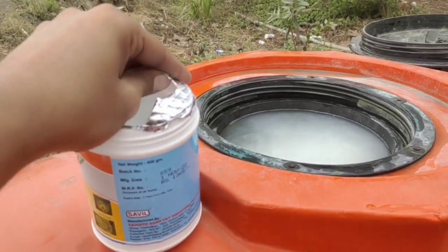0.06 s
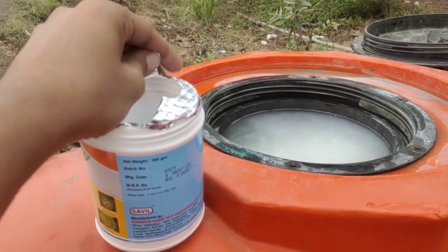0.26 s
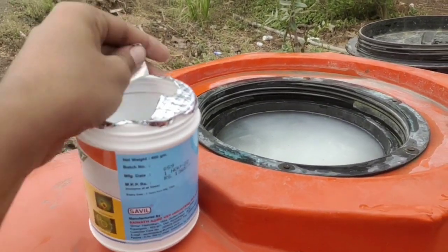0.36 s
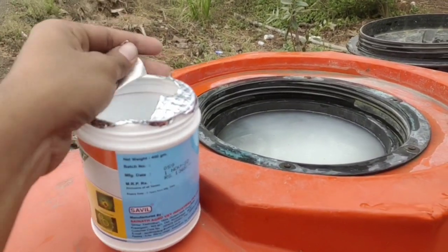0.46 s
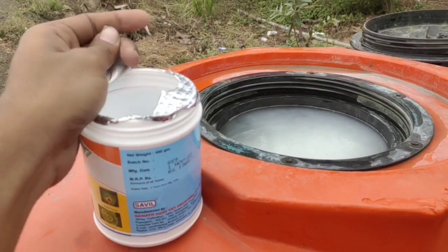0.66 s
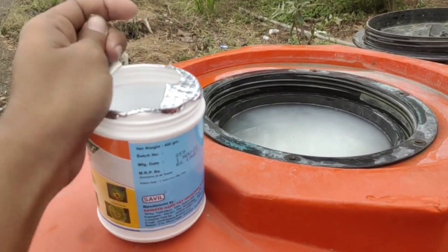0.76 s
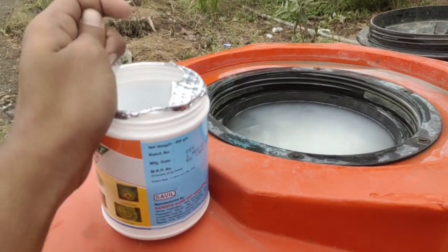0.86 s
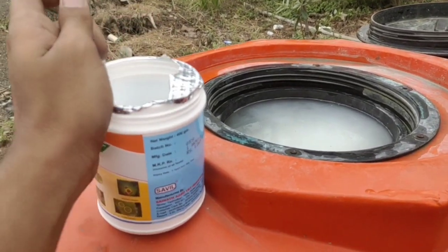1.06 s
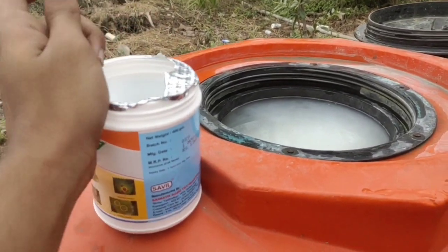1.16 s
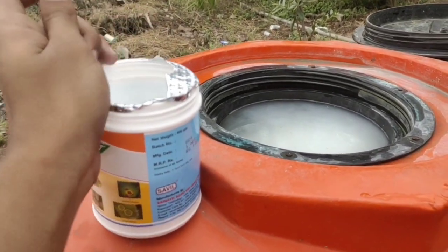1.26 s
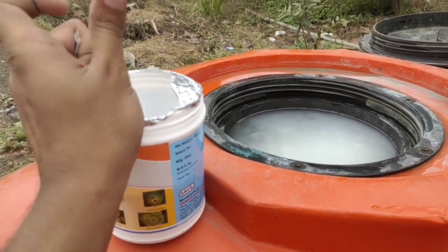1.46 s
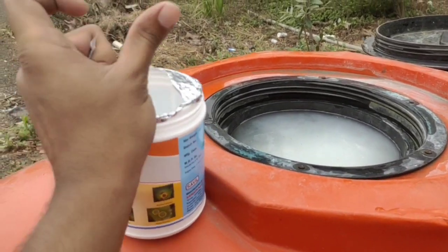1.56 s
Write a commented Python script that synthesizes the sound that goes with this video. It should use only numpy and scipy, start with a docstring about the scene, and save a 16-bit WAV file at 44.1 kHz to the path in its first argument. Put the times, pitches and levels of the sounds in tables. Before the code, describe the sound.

Crinkly foil lid creaks and pops free from a plastic jar while a bird chirps repeatedly

```python
"""First come a faint snap of foil and a bird's two-note call, which goes on repeating.
Outdoors, fingers peel a foil seal off a plastic jar: it creaks, lets go with a pop and is crumpled with small snaps.
Foil and jar are ringing modes with short hisses, over a rustle made of tiny random crackles.
The bird is gliding whistles with a diffuse trail, and an insect is a rising tone roughened by noise.
Far chatter, a low rumble (wind, and the pop's deep thump) and the outdoor hiss are shaped noise bands."""
import sys
import numpy as np
from scipy import signal
from scipy.fft import rfft, irfft
from scipy.io import wavfile

SR = 44100
rng = np.random.default_rng(int(sys.argv[2]) if len(sys.argv) > 2 else 0)


def dump(signal):
    """Clip the signal to [-1, 1] and save it as 16-bit WAV at the path in sys.argv[1]."""
    limited = np.clip(np.atleast_2d(signal).T, -1, 1)
    pcm = np.round(limited * 32767).astype(np.int16)
    wavfile.write(sys.argv[1], SR, pcm)


N = 72765  # length of the scene in samples


def amp(db):
    """Turn dB into a gain."""
    return 10 ** (np.asarray(db) / 20)


def rms_one(x):
    """Scale a sound to an rms of 1."""
    return x / np.sqrt(np.mean(x ** 2) + 1e-20)


def in_time(rows):
    """Draw straight lines through the rows of a table: one curve per column, one value per sample."""
    seconds, *columns = np.transpose(rows)
    return [np.interp(np.arange(N) / SR, seconds, column) for column in columns]


def at_hz(points, hz):
    """Read a spectrum table at any frequency, along a logarithmic pitch scale."""
    table_hz, values = np.transpose(points)
    return np.interp(np.log(hz), np.log(table_hz), values)


def drift(rate_hz):
    """Slow random wandering with a spread of 1: smoothed noise, made at every 40th sample."""
    r = np.exp(-2 * np.pi * rate_hz * 40 / SR)
    noise = rng.standard_normal(N // 40 + 2002)
    slow = signal.lfilter([1], [1, -2 * r, r * r], noise)[2000:]  # skip the filter's start
    return np.interp(np.arange(N) / 40, np.arange(len(slow)), rms_one(slow))


def band(x, low_hz, high_hz):
    """Keep only the sound between two frequencies."""
    sos = signal.butter(2, [low_hz, min(high_hz, .45 * SR)], "band", fs=SR, output="sos")
    return signal.sosfilt(sos, x)


def coloured(x, spectrum):
    """Shape a sound by a spectrum table, then scale to an rms of 1."""
    hz = np.arange(N // 2 + 1) * SR / N + 1  # 1 Hz up, to avoid the log of zero
    return rms_one(irfft(rfft(x) * amp(at_hz(spectrum, hz)), N))


def ports(x, left_db, lag_ms):
    """Two microphones: the left one is left_db stronger and hears lag_ms later."""
    n = np.arange(len(x))
    left = np.interp(n - lag_ms * SR / 1000, n, x)
    return np.array([amp(left_db / 2) * left, amp(-left_db / 2) * x])


def glide(from_hz, to_hz, path):
    """A sine tone whose pitch moves from one frequency to another as path goes from 0 to 1."""
    return np.sin(2 * np.pi * np.cumsum(from_hz + (to_hz - from_hz) * path) / SR)


# The snaps of the foil. Each row: start in seconds, relative level in dB, eleven tone colour values in dB
# (one for each frequency in COLOUR_HZ), left over right in dB, lag of the left ear in ms,
# rise time in ms, stretch of the ringing (a factor), level of the after-hiss in dB against the ring.
FOIL_SNAPS = [(0.014, -45.5, -57, -29, 2.5, -19.5, -58.5, -44, -48, -31, -36, -43, -43, -4, 0.6, 0.26, 1.7, -41),
              (0.096, -58.5, -42, -2, 2, -16, -6, -5, -2, -13, -22, -31, -35, 3.5, 0.57, 0.3, 1.5, -10),
              (0.132, -34.5, -32.5, 11.5, -17, -29, 5, -16.5, -23, -19.5, -32, -36, -50, 3.5, 0.5, 0.21, 1.17, -22),
              (0.142, -42.5, -20.5, 17, -18, -13, -5, -34, -31, -24, -24, -41, -43, 3, 0.57, 0.19, 1.8, -30),
              (0.153, -47, -38, 19, -3, -10, -20, -33, -45, -29, -31, -28, -41, -2, 0.85, 0.3, 1.7, -9),
              (0.222, -9, -9, -24.5, -50, -10, -11, -28, -58, -21, -7, -38, -13, 1.5, 0.5508, 0.26, 1.139, -22.5),
              (0.242, -26, -10, -23, -33, -24, 1.5, -23.5, -29, -14, -40, -11, -18.5, -2, 0.5, 0.3, 1.05, -8.5),
              (0.254, -42.5, 0, -27.5, -21.5, -22.5, -1, -23.5, -22.5, -10.5, -43, -20.5, -11, 5.5, 0.66, 0.39, 1.4, -23.5),
              (0.427, -48.5, -5, -31, -18, -34, -20, -24.5, -17, -21, -14, -44, -12, 5, 0.44, 0.54, 0.69, -5.5),
              (0.598, -67.5, 13, -31, -29, -37, -23, -31, -21, -10, -10, -25, 3, -4, 0.55, 0.5, 1.05, -13),
              (0.663, -37, -12.5, -26, -17, -44.5, -16, -15.5, -22, -13.5, -27.5, -27, -22, 1, 0.48, 0.29, 0.99, -14),
              (1.029, -38, -29, -28, -43.5, -21.5, -23.5, -15.5, -6, -9, -14.5, -33.5, -38.5, 9.5, 0.52, 0.47, 0.57, -18),
              (1.037, -30.5, -53.5, -37.5, -21, -28, 2.5, -14.5, -5, -30, -25, -20, -33, -4, 0.46, 0.5, 0.35, -20),
              (1.201, -44.5, -43, -36, -46, -33, -33, -23.5, -10.5, -10.5, -1, -8, -13.5, 2, 0.544, 0.23, 1.45, -16),
              (1.263, -38, -43.5, -47, -49, -27.5, -45.5, -44.5, -17, -27.5, 3, 1, -13, 10, 0.55, 0.14, 0.64, -14.5),
              (1.277, -43, -25.5, -32, -28, -22, -31.5, -29.5, -9, -14, -10, -12.5, -13.5, -4, 0.58, 0.26, 1.37, -12),
              (1.373, -41.5, -42, -40, -45.5, -44.5, -9.5, -12, -22.5, -14.5, -23.5, -30.5, -23.5, 2, 0.56, 0.23, 1.54, -13),
              (1.478, -51, -21, 21.5, 2, -24, 8, -14, -35.5, -31.5, -20, -39.5, -35, 0.5, 0.37, 0.26, 0.87, -13),
              (1.487, -41, -8, -26, -6, -43.5, 5, -19, -29.5, -25, -28, -41, -36, 7, 0.55, 0.36, 0.86, -6.5),
              (1.559, -28.5, -24.5, -24.5, -29, -33.5, -22.5, -12.5, -3, -22, -36, -15.5, -29.5, 4, 0.56, 0.3, 0.5, -23.5),
              (1.589, -42.5, 3, -17, -27, -16, -7, -22.5, -30.5, -20, -31, -1.5, -5.5, -2, 0.46, 0.14, 0.76, -12.5)]
# The frequencies in Hz that the eleven colour values belong to.
COLOUR_HZ = [200, 480, 650, 900, 1850, 2500, 3100, 4200, 6000, 7600, 10000]
# The tones at which foil and jar ring. Each row: frequency in Hz, relative level in dB,
# time to fade by 60 dB in seconds, before the snap's stretch.
FOIL_AND_JAR_MODES = [(127.4, -22, 0.14), (255, -4, 0.036), (491.2, -20, 0.00823), (701, -7.5, 0.031),
                      (854, 10, 0.0053), (1713, -8.5, 0.0088), (2019, -8, 0.016), (2553, 13, 0.018),
                      (3137, 2.5, .008), (4016, 8, 0.011), (4560, 4.5, 0.022), (6020, -4.5, .004),
                      (6270, -4.5, 0.0026), (7650, -4, .004), (9600, -1, 0.0023), (10220, 4, 0.004),
                      (11870, 3.5, 0.0041), (12300, -4, .003), (14200, -3, .003), (15400, -4.5, .003)]
SNAP_DB, SCATTER_DB = 3.5, 7.06  # lift of all snaps; each mode is up to this much weaker, by chance
ONSET_S, SPREAD_S = .0008, .00022  # wait before the ring; extra random wait of each mode, at most
RISE_CYCLES, DETUNE = .22, .04  # extra rise in cycles of the mode; full width of the random detuning
BASS_LAG_SHARE = .22  # below 1200 Hz the left ear lags by only this share
TAIL_T60_S, TAIL_TOP_T60_S = .047, .025  # fade of the hiss by 60 dB: below 6000 Hz, and from there up


def snaps():
    """Each snap sets the modes ringing with a quick rise; a dying hiss around each mode goes with it."""
    out, t = np.zeros((2, N + SR)), np.arange(SR // 8) / SR
    for start, db, *colour, left_db, lag_ms, rise_ms, stretch, tail_db in FOIL_SNAPS:
        i = int(start * SR)
        hiss = rng.standard_normal((2, len(t)))
        sides = amp([[left_db / 2], [-left_db / 2]])
        for hz, mode_db, t60 in FOIL_AND_JAR_MODES:
            chance, wait, tune = rng.random(3)
            colour_db = np.interp(np.log(hz), np.log(COLOUR_HZ), colour)
            gain = amp(db + SNAP_DB + mode_db + colour_db + SCATTER_DB * (chance - 1))

            # time since the mode began, for the left and the right ear
            lag = lag_ms / 1000 * (BASS_LAG_SHARE if hz < 1200 else 1)
            late = np.maximum(t - ONSET_S - SPREAD_S * wait - [[lag], [0]], 0)

            rise = (1 - np.exp(-late / (rise_ms / 1000 + RISE_CYCLES / hz))) ** 2
            shape = rise * amp(-60 * late / (t60 * stretch))
            tone = np.sin(2 * np.pi * hz * (1 + DETUNE * (tune - .5)) * late)
            ring = shape / shape.max() * tone * sides

            tail_t60 = TAIL_T60_S if hz < 6000 else TAIL_TOP_T60_S
            fade = amp(tail_db - 60 * late / tail_t60) * (1 - np.exp(-late / .0024))
            tail = rms_one(band(hiss, hz * .76, hz * 1.4)) * fade
            # part of the left hiss is shared by both ears
            out[:, i:i + len(t)] += gain * (ring + 1.1 * tail + .5 * tail[0])
    return out[:, :N]


# The foil being rubbed and bent. Each row: time in seconds, level in dB, lift of the bass in dB,
# lift of the treble in dB (a negative lift weakens it).
RUSTLE_COURSE = [(0, -84.5, 23, 17), (.09, -80.5, 19, 6), (.15, -74, 17, -23), (.2, -96, 34.5, -17),
                 (.222, -56, 14, 30), (.238, -39, 12.5, -1), (.245, -33, 3, 2), (.252, -51, 10, 12.5),
                 (.29, -57.5, 4.5, 4.5), (.35, -83, 26.5, 12), (.42, -77, 4.5, 7.5), (.43, -70.5, 4.5, 10),
                 (.445, -64, 8, 9), (.5, -67.5, -1, -11), (.65, -77.5, 2, 16.5), (.675, -71, 7.5, 7.5),
                 (.72, -61.5, 1, 8.5), (.735, -61, -7, 14.5), (.75, -81, 12, 23), (.79, -71.5, 3, 15),
                 (.82, -68, -5, -8), (1.02, -93.5, 27.5, 19), (1.09, -57, 2.5, 2), (1.15, -70, 2.5, 1.5),
                 (1.19, -93, 1, 10), (1.203, -62.5, -6, 17), (1.215, -67.5, -4.5, 4),
                 (1.235, -67.5, -0.5, 15), (1.28, -58.5, 2.5, 10.5), (1.33, -75, 2, 8),
                 (1.46, -73.5, 6, -11), (1.5, -70.5, 19.5, -9.5), (1.55, -63, 11, 5.5), (1.59, -52, 4, 2),
                 (1.65, -78.5, 21.5, 17)]
# The tone colour of the rustle. Each row: frequency in Hz, strength in dB per Hz.
RUSTLE_COLOUR = [(88, -22), (150, -16), (854, -18.5), (1210, -18.5), (2600, -10), (3620, -15.5),
                 (3920, -7.5), (6770, -22.5), (11700, -26), (16000, -21.5)]
GRAINS_PER_S, RUSTLE_LAG_MS, RUSTLE_TREBLE_HZ = 5300, .35, 8000


def rustle():
    """Rubbed foil gives dense tiny crackles of uneven size, coloured like the foil."""
    db, bass_db, treble_db = in_time(RUSTLE_COURSE)
    size = amp(1.6 * np.minimum(rng.exponential(1, (2, N)), 5)) * rng.standard_normal((2, N))
    happens = rng.random((2, N)) < GRAINS_PER_S / SR
    near, wide = coloured(size * happens, RUSTLE_COLOUR)
    # the second set of crackles has opposite signs at the two ears, which sounds wide
    foil = ports(near, 2.8, RUSTLE_LAG_MS) + .5 * wide * [[1], [-1]]
    bass = (amp(bass_db) - 1) * band(foil, 76, 1100)
    treble = (amp(treble_db) - 1) * band(foil, RUSTLE_TREBLE_HZ, SR)
    return amp(db) * (foil + bass + treble)


# The bird's calls. Each row: start in seconds, relative level of the first note in dB, of the second in dB.
BIRD_CALLS = [(.040, -61, -58), (0.294, -61, -56), (0.557, -63.5, -61.5), (.827, -64.5, -61.5),
              (1.099, -60.5, -57), (1.375, -61, -59)]
# The two notes of a call. Each row: start within the call in seconds, length in seconds,
# first pitch in Hz, last pitch in Hz.
CALL_NOTES = [(0, .021, 4684, 3694), (0.02, .02, 4247, 3928)]
BIRD_LEFT_DB, BIRD_LAG_MS = 6, .44  # left over right; lag of the left ear
BIRD_TRAIL_DB, BIRD_TRAIL_T60_S = -39.5, .5  # strength of the trail; its fade by 60 dB
WAVER = .25  # depth of the random trembling


def bird():
    """Each call is two falling, trembling whistles, with a diffuse trail of dying noise from the trees."""
    calls = np.zeros(N + SR)
    for call_start, *levels in BIRD_CALLS:
        for (start, length, from_hz, to_hz), db in zip(CALL_NOTES, levels):
            u = np.arange(int(length * SR)) / (length * SR)  # 0 to 1 through the note
            i = int((call_start + start) * SR)
            swell = np.sqrt(np.sin(np.pi * u ** 2))
            calls[i:i + len(u)] += amp(db + 5) * swell * glide(from_hz, to_hz, u)
    calls = calls[:N] * (1 + WAVER * rms_one(band(rng.standard_normal(N), 40, 380)))

    t = np.arange(SR // 2) / SR
    trail = rng.standard_normal((2, len(t))) * amp(BIRD_TRAIL_DB - 60 * t / BIRD_TRAIL_T60_S)
    direct = ports(calls, BIRD_LEFT_DB, BIRD_LAG_MS)
    diffuse = signal.fftconvolve(ports(calls, BIRD_LEFT_DB, 0), trail, axes=1)[:, :N]
    return direct + diffuse


# The insect's bursts. Each row: start in seconds, length in seconds, first pitch in Hz, last pitch in Hz,
# relative level in dB.
INSECT_BURSTS = [(0.111, 0.073, 6420, 6560, -71), (0.347, 0.097, 6320, 6590, -71.5),
                 (0.632, 0.082, 6280, 6690, -72.5), (0.889, 0.19, 6400, 6560, -70),
                 (1.095, 0.055, 6140, 6260, -68.5), (1.154, 0.072, 6340, 6620, -68.5),
                 (1.408, 0.063, 6200, 6270, -78), (1.456, 0.08, 6400, 6520, -72)]
BUZZ_WIDTH_HZ, BUZZ_LEFT_DB = 120, 4  # top frequency of the roughening noise; left over right


def insect():
    """Each burst is a rising tone whose strength is shaken by slow noise, so that it buzzes."""
    out = np.zeros((2, N + SR))
    lowpass = signal.butter(2, BUZZ_WIDTH_HZ, fs=SR, output="sos")
    rough = rms_one(signal.sosfilt(lowpass, rng.standard_normal((2, N))))
    for start, length, from_hz, to_hz, db in INSECT_BURSTS:
        u = np.arange(int(length * SR)) / (length * SR)  # 0 to 1 through the burst
        i = int(start * SR)
        edges = np.minimum(1, 10 * np.minimum(u, 1 - u))  # fade in and out
        out[:, i:i + len(u)] += amp(db + 3) * edges * glide(from_hz, to_hz, np.sqrt(u))
    return out[:, :N] * (.4 + rough) * amp([[BUZZ_LEFT_DB / 2], [-BUZZ_LEFT_DB / 2]])


# The far birds. Each row: time in seconds, relative level of the low band in dB, of the high band in dB.
CHATTER_COURSE = [(0, -87, -86), (.1, -81, -78), (.19, -70, -74.5), (.3, -75.5, -75), (.38, -80, -82),
                  (.45, -70.5, -72), (.55, -72, -70), (.63, -68, -73), (.7, -64.5, -71), (.77, -73, -71),
                  (.81, -65.5, -72), (.9, -67.5, -74.5), (.96, -80.5, -71.5), (1.03, -71, -73.5),
                  (1.09, -78, -64), (1.18, -80, -71.5), (1.3, -86, -70), (1.39, -69, -66),
                  (1.47, -70.5, -68), (1.57, -67.5, -73.5), (1.65, -67.5, -74)]


def chatter():
    """Far birds blur into two fluttering bands of noise, stronger on the left."""
    low_db, high_db = in_time(CHATTER_COURSE)
    white = rng.standard_normal((2, 2, N))
    low = amp(low_db + 2 * drift(21)) * rms_one(band(white[0], 2284, 2900))
    high = amp(high_db + 2 * drift(27)) * rms_one(band(white[1], 3700, 5384))
    return (low + high) * amp([[3], [-3]])


# How alike the two ears are. Each row: frequency in Hz, likeness (0 is unrelated, 1 is the same).
EAR_LIKENESS = [(60, 0.6), (180, 0.97), (550, 0.92), (1650, 0.053), (4970, 0.062), (15000, 0.066)]
# The balance of the two ears. Each row: frequency in Hz, left over right in dB.
EAR_BALANCE = [(60, 3.5), (110, -5.5), (200, -1.5), (380, -2), (700, -10), (1290, 0.5), (2380, 2),
               (4400, 4), (8120, -3), (15000, -2.5)]


def banded_noise(spectrum, patchy_db):
    """Third-octave bands of stereo noise, each with its own flicker, likeness and balance; rms 1."""
    out, edges = 0, 22 * 2 ** np.arange(0, 9.7, 1 / 3)
    white = rng.standard_normal((2, 2, N))
    for k, (low, high) in enumerate(zip(edges, edges[1:])):
        hz = np.sqrt(low * high)
        if spectrum[0][0] < hz < spectrum[-1][0]:
            mid, side = band(white[k % 2], low, high)  # neighbouring bands use different noise
            alike = at_hz(EAR_LIKENESS, hz)
            stereo = np.sqrt(1 + alike) * mid + np.sqrt(1 - alike) * side * [[1], [-1]]
            tilt_db = at_hz(EAR_BALANCE, hz) / 2 * np.array([[1], [-1]])
            out = out + amp(at_hz(spectrum, hz) + patchy_db * drift(10.7) + tilt_db) * stereo
    return rms_one(out)


# Low rumble: light wind, and the deep thump of the pop at 0.224 s. Each row: time in seconds,
# level of the deep part in dB, level of the upper part in dB.
RUMBLE_COURSE = [(0.0, -77, -61.5), (0.054, -73, -81.5), (0.188, -97, -62), (0.224, -50, -47),
                 (0.242, -65.5, -54), (0.294, -74.5, -55.5), (0.326, -58, -50.5), (0.432, -99, -71.5),
                 (0.62, -74, -62), (0.648, -74, -53), (0.688, -80.5, -61.5), (0.738, -88, -62),
                 (0.808, -73.5, -78), (0.868, -63.5, -65.5), (1.038, -78, -68), (1.06, -62, -74),
                 (1.084, -70.5, -87), (1.198, -77.5, -72), (1.25, -90, -89.5), (1.286, -96.5, -70),
                 (1.382, -61, -69), (1.414, -72, -58.5), (1.516, -66.5, -75), (1.562, -83, -71),
                 (1.594, -63, -64.5), (1.65, -87, -56)]
# The tone colour of the low rumble. Each row: frequency in Hz, strength in dB per Hz.
RUMBLE_COLOUR = [(12, -52), (20, -18), (32, -20), (66, -2), (113, 4), (193, -23), (258, -10.5), (353, -28),
                 (400, -33.5), (520, -52.5), (880, -120)]


def low_rumble():
    """Light wind and the pop's deep thump: low flickering noise, its deep and upper parts swelling apart."""
    deep_db, upper_db = in_time(RUMBLE_COURSE)
    rumble = banded_noise(RUMBLE_COLOUR, patchy_db=6.74)
    deep = amp(deep_db) * rms_one(band(rumble, 37, 88.6))
    upper = amp(upper_db) * rms_one(band(rumble, 61, 460))
    return deep + upper


# The tone colour of the outdoor hiss. Each row: frequency in Hz, strength in dB per Hz.
AIR_COLOUR = [(120, -32), (200, -17), (273, -7.5), (1400, -6.5), (2510, -7), (3190, -16.5), (4040, 2.5),
              (5420, -17), (6640, -7.5), (7140, -39.5), (7970, -12), (16000, -8)]
# The course of the outdoor hiss; only its rise and fall counts. Each row: time in seconds, level in dB.
AIR_COURSE = [(0.0, -89.5), (0.058, -91), (0.26, -79.5), (0.444, -89), (0.694, -89), (1.328, -88),
              (1.52, -85), (1.616, -74.5), (1.65, -75)]
AIR_DB = -71.5  # average level


def air():
    """The outdoor hiss is wide flickering noise that slowly rises and falls about its average level."""
    course_db, = in_time(AIR_COURSE)
    return amp(AIR_DB + course_db - course_db.mean()) * banded_noise(AIR_COLOUR, patchy_db=3.1)


def scene():
    """Add all the sources together."""
    rumble = low_rumble()
    return snaps() + rustle() + bird() + insect() + chatter() + rumble + air()


CUTOFF_HZ = 16000


def record(dry):
    """The deep bass rolls off below 40 Hz, and the top is cut steeply just above the cutoff."""
    highpass = signal.butter(2, 40, "high", fs=SR, output="sos")
    lowpass = signal.cheby2(12, 60, CUTOFF_HZ + 600, fs=SR, output="sos")  # 60 dB down 600 Hz higher
    return signal.sosfilt(lowpass, signal.sosfilt(highpass, dry))


dry = scene()
out = record(dry)
dump(out)
```